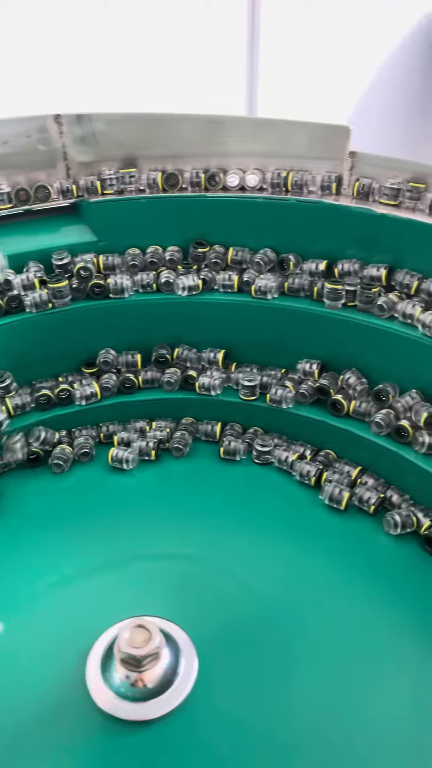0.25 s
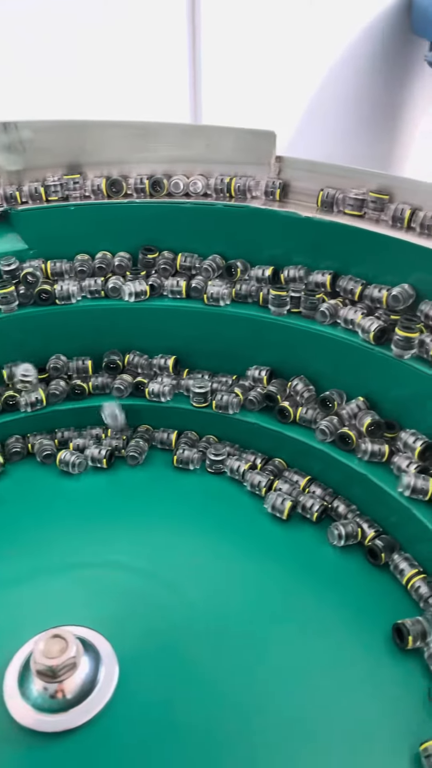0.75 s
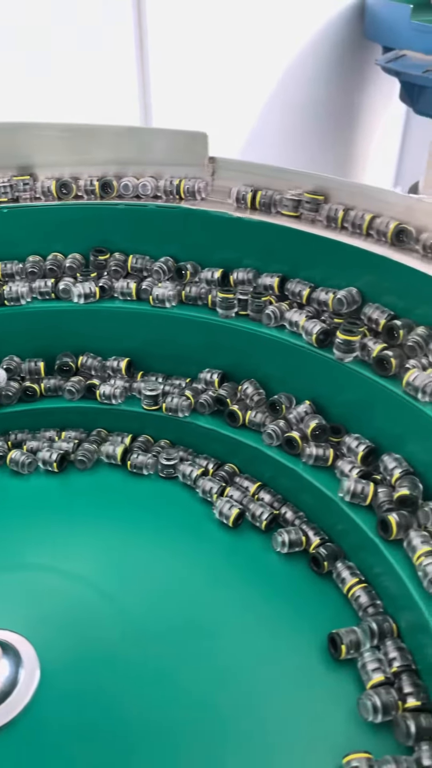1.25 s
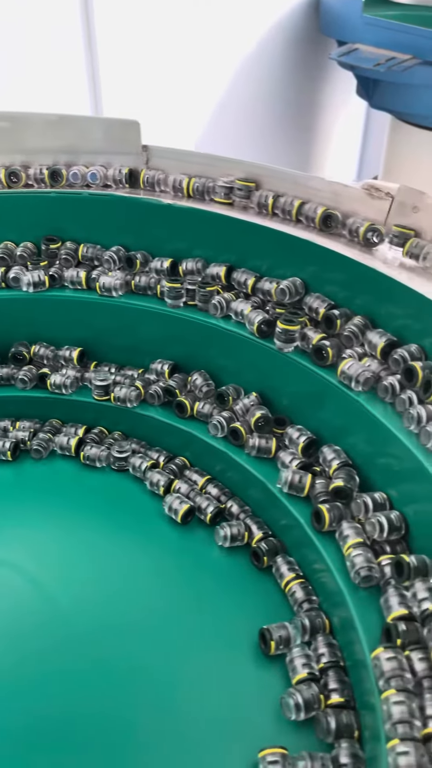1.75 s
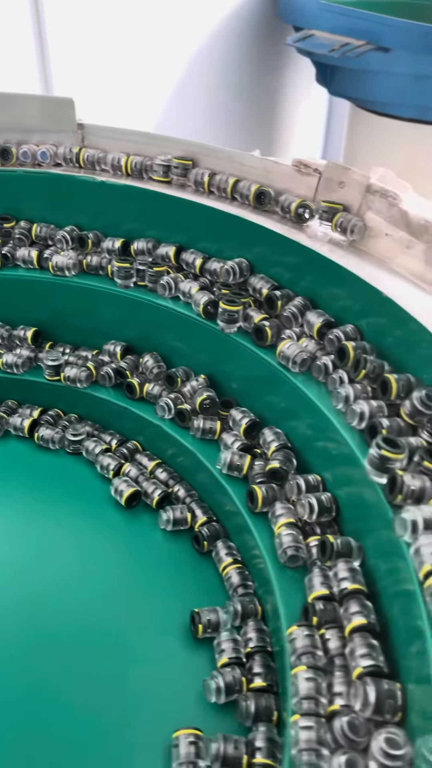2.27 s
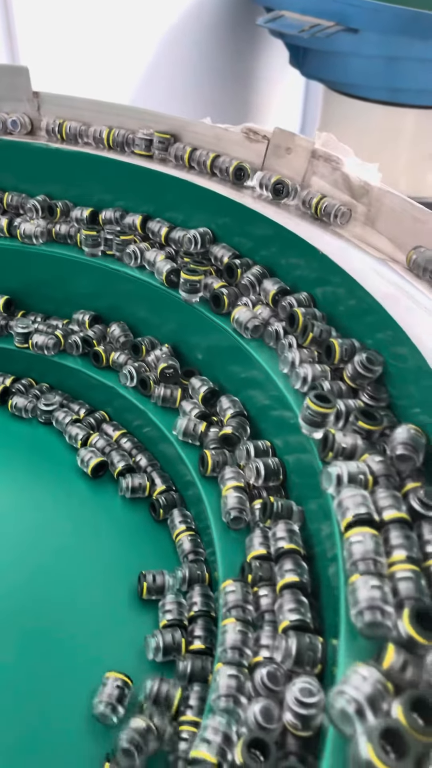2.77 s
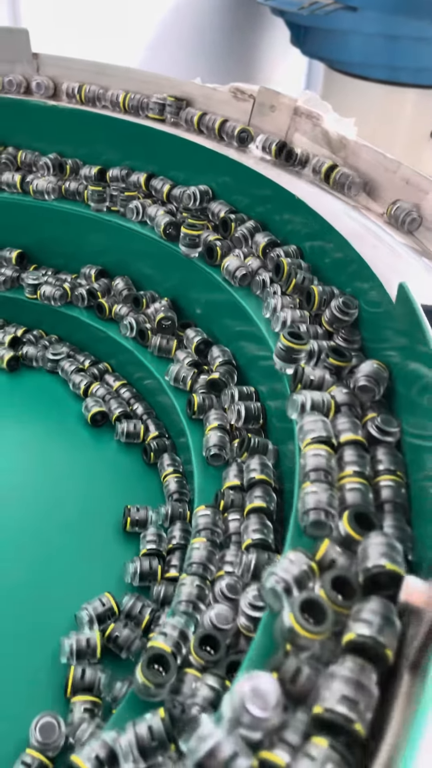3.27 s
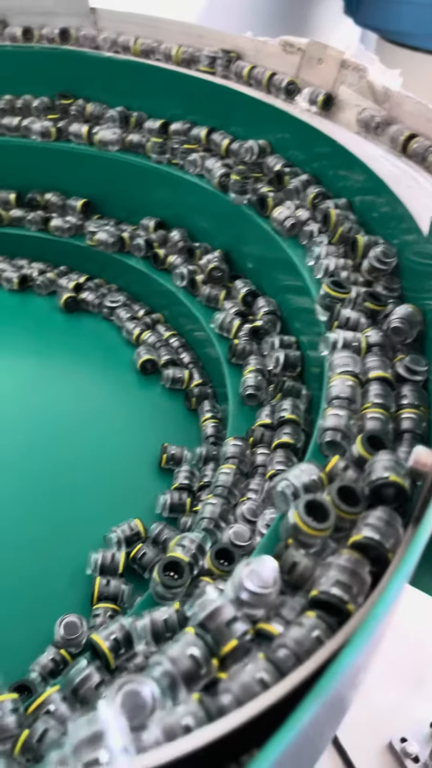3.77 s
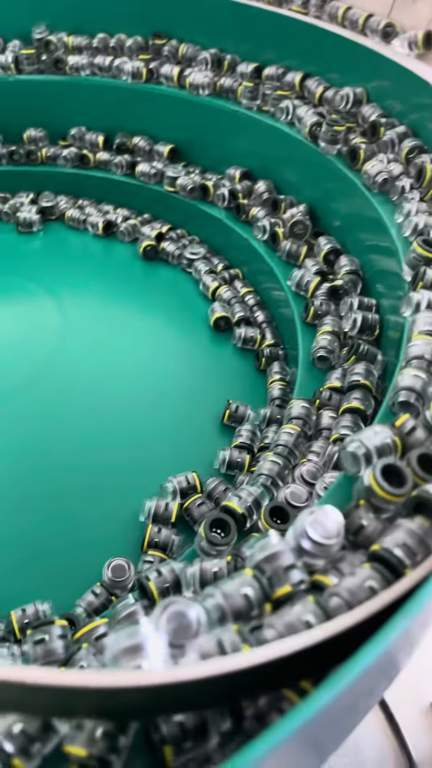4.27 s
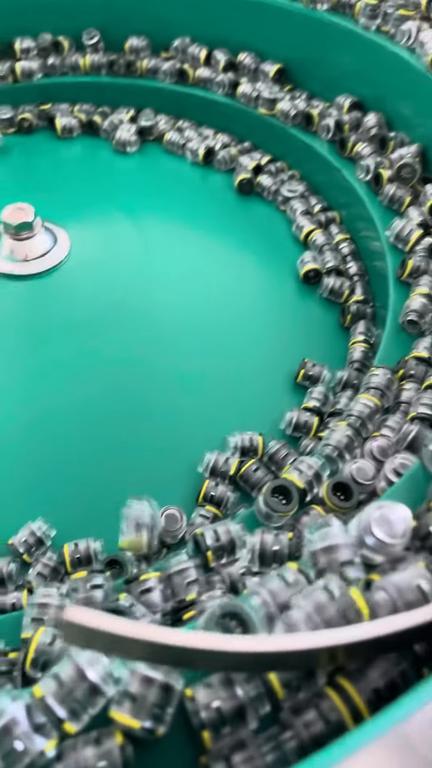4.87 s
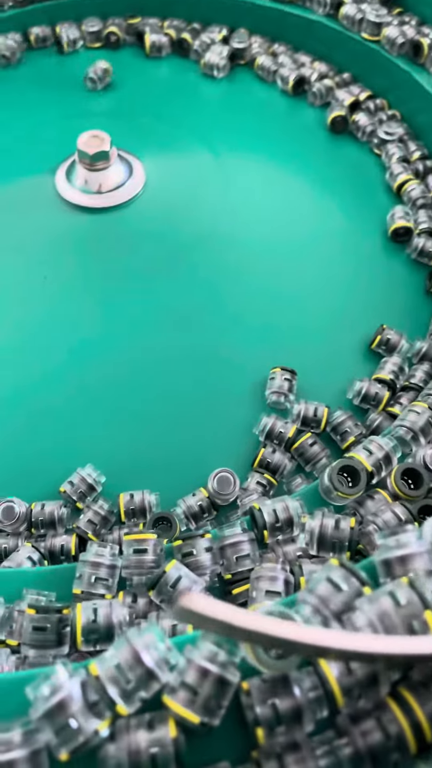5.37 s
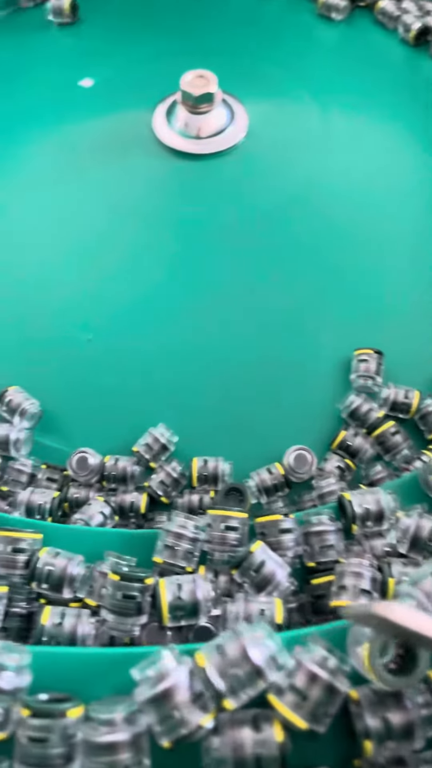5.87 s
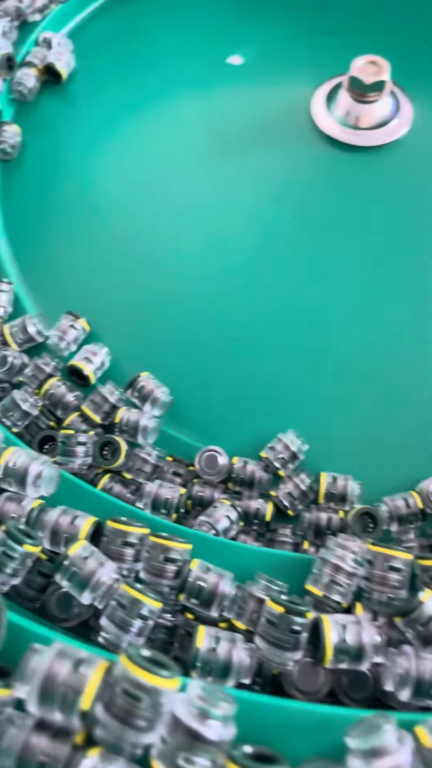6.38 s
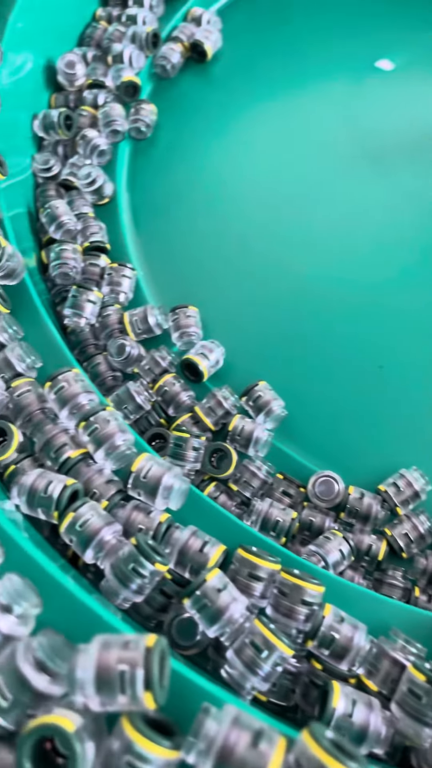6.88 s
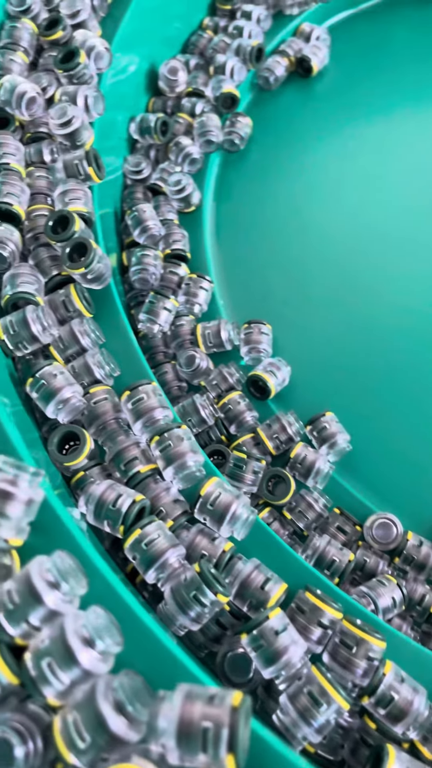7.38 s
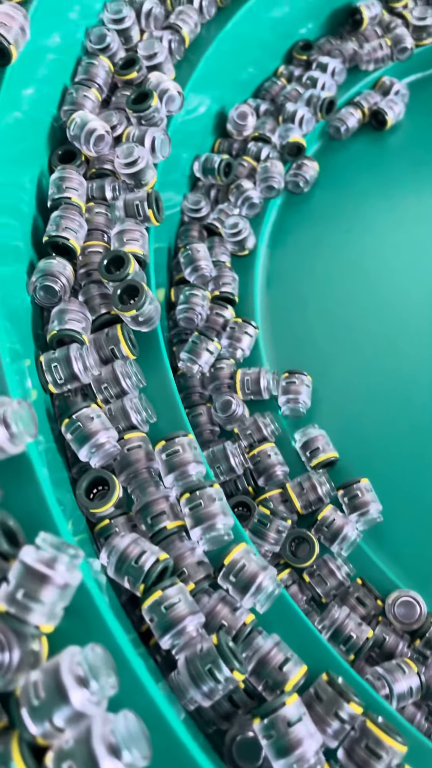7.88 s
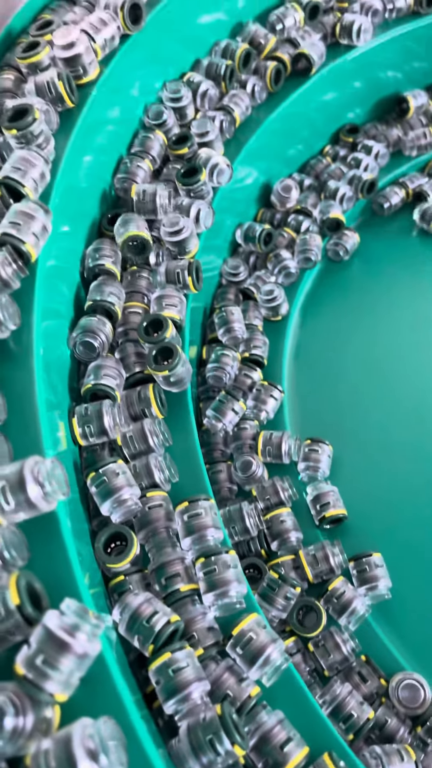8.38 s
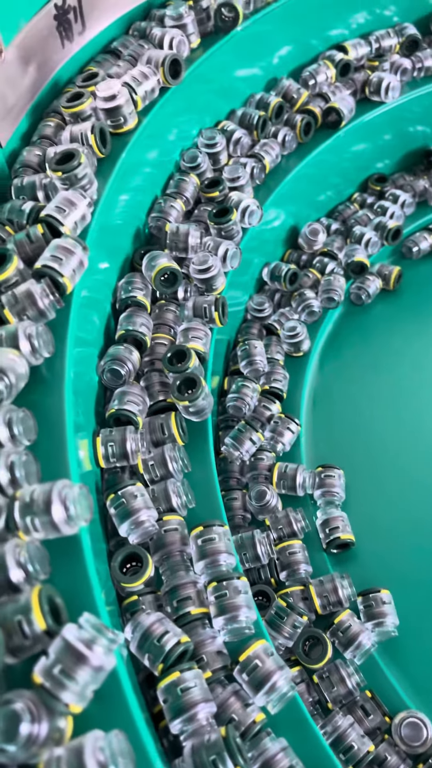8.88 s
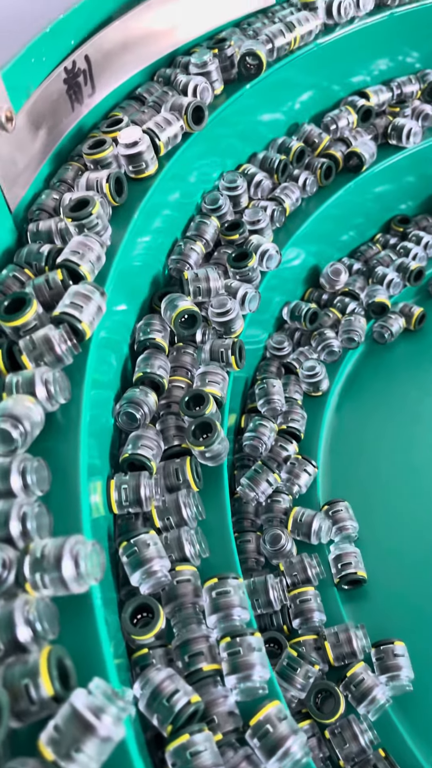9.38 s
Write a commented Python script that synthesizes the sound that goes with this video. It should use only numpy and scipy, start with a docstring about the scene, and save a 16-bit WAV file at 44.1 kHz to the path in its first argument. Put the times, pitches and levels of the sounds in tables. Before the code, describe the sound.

A vibratory feeder bowl hums low and steady while masses of small plastic parts rattle densely, with bright clacks, brief steel rings and soft thuds.

```python
"""Mains-rate hum and a dense rattle of small parts, with bright clacks, steel rings and soft thuds.
A vibratory bowl feeder shakes while a hand-held camera pans over it. Its magnet sums exact orders of the drive;
hopping parts are ticks bunched on each throw; knocking parts are short tinted grains.
Rejected parts fall as shaped noise bursts, and drive resonators for the bowl, a plate and the top rail."""
import sys
import numpy as np
from scipy import signal
from scipy.fft import rfft, irfft
from scipy.io import wavfile
from scipy.ndimage import uniform_filter1d, minimum_filter1d

SR = 44100
rng = np.random.default_rng(int(sys.argv[2]) if len(sys.argv) > 2 else 0)


def generate_wav(sig):
    """Save sig (samples, or channels by samples) to the path in sys.argv[1] as 16-bit PCM at SR."""
    pcm = np.round(np.clip(np.atleast_2d(sig).T, -1, 1) * 32767).astype(np.int16)
    wavfile.write(sys.argv[1], SR, pcm)


def attenuation_scalar(level_db):
    """Turn a level in dB into a linear amplitude multiplier (20 dB per decade)."""
    decades = np.asarray(level_db, float) / 20
    return 10 ** decades


N = 425124
T = np.arange(N) / SR
HZ = np.fft.rfftfreq(N, 1 / SR)

DRIVE_HZ = 50.014
TURN_RAD = 2 * np.pi * DRIVE_HZ * T + 1.38
# Hum as the camera moves. Each row: time in seconds, first order rms in dB, its left-right in dB,
# then the 12th, 14th, 15th and 16th orders in dB before their channel offsets.
HUM_PATH = [(0, -14.5, -5, -45.5, -36, -41, -45.5), (2.2, -15.5, -4.5, -38, -41, -44, -42.5),
            (3.6, -18.5, 0, -41, -40, -42.5, -39.5), (4.4, -20, 1, -40.5, -50, -39.5, -43.5),
            (5.6, -17.5, -1, -40.5, -42, -38, -37.5), (7.2, -17, -1.5, -40.5, -35.5, -46, -36.5),
            (8.4, -17, -3.5, -42, -35, -45, -40), (8.9, -18, -4, -42, -32.5, -46, -45),
            (9.64, -17, -4.5, -47, -35.5, -44, -49)]
# Steady orders of the drive. Each row: order, left rms in dB, right rms in dB.
STEADY_ORDERS = [(2, -24.5, -23), (3, -37, -32.5), (4, -36, -40), (5, -56, -42), (6, -49, -42.5),
                 (8, -58, -42.5), (10, -65.5, -45), (11, -58, -49)]

# Colour of the hopping parts. Each row: frequency in Hz, relative density in dB per Hz.
RATTLE_SPECTRUM = [(40, -3), (150, 4.5), (250, 0.5), (480, -8), (900, -3.5), (1200, 0.5), (2500, 4.5),
                   (3200, 1), (5000, -4.5), (7300, -6.5), (8600, -6.5), (10300, -9), (11400, -15),
                   (12400, -20), (13200, -65), (16000, -85)]
# Rattle as the camera moves. Each row: time in seconds, relative level in dB.
RATTLE_PATH = [(0.0, -26.5), (0.51, -25), (0.88, -26.5), (1.37, -25.5), (8.06, -25.5), (9.64, -27)]
# Bowl resonances, the first five answering a thud. Each row: frequency in Hz, width in Hz, gain in dB.
BOWL_MODES = [(670, 7.7, -22), (680.3, 13, 0.5), (785, 65, -3.5), (1048, 22, -7), (1226, 124, -2.5),
              (367, 4.7, -7.5), (1544, 36, -2.5), (1770, 53, 0), (2394, 19, -3), (2613, 20, -2.5)]

# The clearest falling parts. Each row: time in seconds, relative level in dB,
# clatter t60 in seconds before its limits, body level in dB against the snap.
CLEAR_FALLS = [(.0374, -14, 0.25, -5), (0.1283, -10, .15, 4), (.214, -16.5, 0.12, 4),
               (.2618, -15, 0.21, 3.5), (.2765, -16, 0.066, 9), (.319, -16, 0.18, -2),
               (0.369, -12.5, 0.17, -11), (.438, -18.5, 0.092, -14), (.465, -11, 0.063, 5),
               (0.496, -15, .4, 0.5), (0.584, -9, .12, 3), (0.6479, -11.5, 0.49, -2),
               (1.083, -7.5, .19, -12), (1.21, -16, 0.22, -6), (1.27, -17.5, .12, -2),
               (1.366, -13.5, .096, -21), (1.4117, -8, 0.25, -22.5), (1.439, -11.5, 0.54, 3),
               (1.4777, -8, 0.058, 3), (1.604, -14.5, .1, 2), (1.637, -13.5, 0.11, 5),
               (1.696, -16.5, 0.33, -18), (1.8306, -16, 0.15, 4), (1.9163, -12, .044, -9),
               (1.953, -9.5, 0.066, 1), (2.0685, -6.5, 0.1, 4), (2.4379, -13.5, .056, -14),
               (2.555, -11, 0.18, -4), (2.663, -11.5, .067, -19), (2.753, -3.5, 0.18, -8),
               (2.8741, -15.5, 0.58, 2.5), (3.0319, -10, 0.34, -5), (3.09, -11, .1, -8),
               (3.1575, -12.5, 0.073, 5), (3.332, -13.5, .03, -31), (3.5046, -9.5, 0.051, 11),
               (3.6489, -5, 0.13, -9), (3.7375, -1.5, 0.042, -4), (3.8666, -16, 0.046, -11),
               (3.9398, -11, .12, -16), (3.973, -9, 0.48, -9), (4.007, -9, 0.07, 6.5),
               (4.0882, -14.5, .07, 7), (4.158, -10, 0.075, -33), (4.2284, -8, 0.074, -2),
               (4.2688, -11.5, 0.13, 1), (4.3573, -9.5, 0.059, -3), (4.398, -13, .093, -8),
               (4.451, -11, .03, -7), (4.4985, -10.5, 0.039, -3), (4.5274, -14, 0.084, -2),
               (4.615, -17, .09, -8), (4.8253, -7, 0.047, 8), (4.9301, -8, 0.16, 2),
               (5.033, -10, 0.062, 9.5), (5.0748, -13.5, 0.068, 7), (5.1893, -12, 0.11, -2),
               (5.4077, -13, 0.057, -14), (5.5762, -7, 0.085, 6.5), (5.6013, -7.5, 0.19, -6),
               (5.762, -13, 0.11, 8.5), (5.8293, -8, 0.12, 0.5), (5.898, -6, 0.14, -12),
               (6.0023, -4, 0.18, -11), (6.039, -13, .087, -8), (6.224, -11.5, 0.26, -15),
               (6.2917, -14.5, 0.3, -32), (6.4238, -13, .19, -6), (6.8277, -11, .18, -20),
               (6.915, -3.5, 0.046, -4), (7.007, -13, .079, -13), (7.0353, -6, 0.11, 6.5),
               (7.1323, -8.5, 0.096, 5), (7.194, -11, 0.18, -10), (7.2307, -17.5, 0.17, 10.5),
               (7.5594, -6.5, .049, -5), (7.682, -14, .13, -6), (8.028, -10.5, .35, -26),
               (8.106, -12, .09, -1), (8.1444, -11, 0.68, -3), (8.3763, -9, .16, 3), (8.396, -10, .19, -6),
               (8.512, -16, 0.34, -10), (8.752, -10, 0.037, 10), (8.851, -12.5, 0.16, 1),
               (9.3551, -6, 0.12, -4), (9.4414, -14.5, 0.2, 1), (9.462, -12, 0.34, 3)]
# Colours of a clack: snap, body, top edge. Each row: frequency in Hz, relative density in dB per Hz.
SNAP_SPECTRUM = [(1500, -14), (3500, -3.5), (5500, 3), (9500, 3), (10500, -19.5), (12000, -36)]
BODY_SPECTRUM = [(600, -22), (950, 1), (1500, 10.5), (2500, 9), (4000, 5.5), (6000, -20)]
EDGE_SPECTRUM = [(8500, -52), (10200, 10), (11400, -2), (12500, -12), (13500, -14), (16000, -56)]
# Lesser falls come at random; these are their mean settings.
SMALL_PER_S, SMALL_DB, SMALL_T60_S, SMALL_BODY_DB = 1.2, -19, 0.064, -6
# A full-bodied landing has little top edge.
EDGE_DB, EDGE_PER_BODY_DB, EDGE_SPREAD_DB = -17.5, -0.46, 3.0
TINT_RMS_DB = 4.5  # how strongly each part's own resonances colour its clack

# Modes of a steel plate. Each row: frequency in Hz, gain in dB, t60 in seconds, group 0-4 from low to high.
PLATE_MODES = [(1335, 0, .16, 0), (1499, -2, .13, 0), (1420, -6, .07, 0), (1658, 1, .17, 1),
               (1735, -5, .15, 1), (2550, -8, .1, 1), (3660, -4, .11, 2), (3920, -5, .09, 2),
               (4370, 0, .09, 2), (4520, -4, .07, 2), (6700, -6, .11, 2), (7665, -1, .1, 3),
               (8890, -2, .07, 4), (8650, -5, .06, 4), (9400, -6, .06, 4)]
# Modes of the top rail, columns as for the plate.
RAIL_MODES = [(2500, 0, .2, 0), (3270, -5, .18, 1), (5220, -2, .1, 2), (6440, -10, .15, 3),
              (7780, 0, .15, 4)]
# Parts landing on the plate. Each row: time in seconds, drive of its lowest, middle and highest groups in dB.
PLATE_LANDINGS = [(.465, -27.5, -28, -40), (1.083, -24, -29, -20), (1.411, -25.5, -22, -24),
                  (2.754, -22, -33, -36), (3.65, -28, -16, -27), (3.972, -22, -22, -11),
                  (4.229, -22.5, -25, -35), (5.599, -26, -18.5, -37), (6.004, -20, -20, -18),
                  (6.424, -22.5, -17.5, -11), (6.828, -24.5, -22, -6.5), (8.029, -22, -29, -9),
                  (8.511, -42, -23.5, -18), (8.399, -23.5, -28, -34), (9.462, -22, -25, -13)]
# Parts landing on the rail, columns as for the plate.
RAIL_LANDINGS = [(0.464, -22, -35, -22), (2.903, -36, -22, -30), (3.737, -28, -17, -23),
                 (3.805, -44, -26, -25), (4.158, -39, -23, -24), (4.357, -32, -21, -20),
                 (4.398, -38, -35, -32), (5.762, -27, -21, -34), (6.529, -27, -28, -25.5),
                 (8.145, -38, -27, -25), (8.512, -23, -33, -17)]

# Parts that drop to the bowl's floor. Each row: time in seconds, drive at the start in dB.
FLOOR_DROPS = [(.5846, -60), (1.4392, -54.5), (1.639, -59), (1.952, -58.5), (2.0686, -52.5), (2.1567, -64),
               (3.1577, -61), (3.5043, -59.5), (4.0067, -63), (4.8263, -58.5), (4.9304, -54), (5.034, -55),
               (6.915, -58), (7.0355, -50.5), (7.1319, -54.5), (7.194, -52.5), (7.2313, -55), (7.5594, -57),
               (8.397, -59), (8.752, -55), (8.851, -57.5)]
THUD_T60_S = 0.17

CLINKS_PER_S, CLINK_DB = 49, -27
SHORTEST_CLINK_T60_S, LONGEST_CLINK_T60_S = .015, .035

# Stereo likeness by frequency, nearly alike around 9 kHz and above 12 kHz.
# Each row: frequency in Hz, likeness 0-1, right lag in radians, left-right in dB.
STEREO_IMAGE = [(150, .98, 0, -3), (500, .3, -1, -6), (860, .1, -.3, -7), (1200, .4, .4, -2),
                (1900, .75, .2, 0), (2600, .15, 2.3, 0), (3300, .45, 2.8, -1), (4000, .4, 1.3, -2),
                (4650, .57, 2.9, -3), (5700, .9, 6.1, 0), (7400, .75, 8.1, 0), (8450, .95, 9.2, 0),
                (9000, .99, 9.4, 0), (9550, .995, 9.44, 0), (11200, .7, 11.4, 0), (11900, .97, 12.56, 0),
                (13300, .97, 12.57, 0), (15300, .8, 15.7, 0)]
# Treble roll-off of the microphone. Each row: frequency in Hz, gain in dB.
MICROPHONE_RESPONSE = [(12600, 0), (13300, -16), (16000, -20)]


def evened(x):
    """Scales to rms 1."""
    return x / np.sqrt(np.mean(x ** 2))


def smoothed_twice(x, size):
    """Two running means along the last axis."""
    return uniform_filter1d(uniform_filter1d(x, size), size)


def read(hz, values):
    """A spectrum table at every frequency, straight on a log axis."""
    return np.interp(np.log(HZ + 1), np.log(np.asarray(hz) + 1.), values)


def coloured(x, spectrum):
    """Filters by a spectrum table, keeping the power of white input."""
    response = evened(attenuation_scalar(read(*np.transpose(spectrum))))
    return irfft(rfft(x) * response, N)


def ring(blows, hz, t60_s):
    """A two-pole resonator: each click starts a dying sine of its height."""
    radius = attenuation_scalar(-60 / (max(t60_s, .0003) * SR))
    w = 2 * np.pi * hz / SR
    return signal.lfilter([0, np.sin(w)], [1, -2 * radius * np.cos(w), radius * radius], blows)


def waver():
    """Slow chance for each channel, rms 1 overall."""
    return evened(smoothed_twice(rng.standard_normal((2, N)), 3000))


def hum():
    """Exact orders of the magnet's pull; each steady order lags more, peaking the wave; the top ones waver."""
    s, *columns = np.transpose(HUM_PATH)
    first_db, pan_db, *upper_db = (np.interp(T, s, c) for c in columns)
    lead_rad = np.array([[0.], [.08]])
    out = attenuation_scalar([first_db + pan_db / 2, first_db - pan_db / 2]) * np.cos(TURN_RAD + lead_rad)
    for order, *db in STEADY_ORDERS:
        phase = order * (TURN_RAD + lead_rad) - 0.78 * (order - 1)
        out = out + attenuation_scalar(np.array(db))[:, None] * np.cos(phase)
    for order, db in zip((12, 14, 15, 16), upper_db):
        level = attenuation_scalar([db - 1.5, db + 6.0] + 2.0 * waver())
        offset_rad = np.array([[1.514 * order], [1.477 * order + 2.07]])
        out = out + level * np.cos(order * TURN_RAD + offset_rad)
    return np.sqrt(2) * out  # rms to peak


def bowl(drive, modes):
    """The coated bowl's damped resonances; a wider one dies sooner."""
    return sum(attenuation_scalar(db) * np.sqrt(width_hz) * ring(drive, hz, 1.9 / width_hz) for hz, width_hz, db in modes)


def rattle():
    """Dense ticks of hopping parts, bunched on each throw of the track; they also drum the bowl."""
    ticking = rng.random((2, N)) < 5000 / SR  # 5000 ticks a second in each channel
    size = attenuation_scalar(3.6 * np.minimum(rng.exponential(1, (2, N)), 5)) * ticking
    ticks = .5 * evened(size * rng.standard_normal((2, N)))
    ticks = ticks + 0.97 * rng.standard_normal((2, N))
    surge = evened(smoothed_twice(rng.standard_normal(N), 900))
    bunching_db = 1.0 * np.cos(TURN_RAD + 1.6) + 1.6 * surge
    track = coloured(ticks * attenuation_scalar(bunching_db), RATTLE_SPECTRUM)
    thrown = ticks * (0.44 + np.exp(0.8 * (np.cos(TURN_RAD + 0.17) - 1)))
    drummed = bowl(thrown, BOWL_MODES)
    nearness = attenuation_scalar(np.interp(T, *np.transpose(RATTLE_PATH)))
    return nearness * (attenuation_scalar(2.0) * evened(track) + attenuation_scalar(-6.5) * evened(drummed))


def small_falls():
    """Lesser falls at random times, in rows like those of the clear ones."""
    return [(.01 + when * (N / SR - .01), SMALL_DB + 1.7 * (size - .5),
             SMALL_T60_S * (.5 + length), SMALL_BODY_DB + 12 * (face - .5))
            for when, size, length, face in rng.random((round(SMALL_PER_S * N / SR), 4))]


def falls():
    """A crack and a ragged clatter of rebounds, tinted by the part's own resonances."""
    t = np.arange(8192) / SR
    log_hz = np.log(np.fft.rfftfreq(len(t), 1 / SR) + 1)
    colours_db = []
    for spectrum in (SNAP_SPECTRUM, BODY_SPECTRUM, EDGE_SPECTRUM):
        hz, db = np.transpose(spectrum)
        colours_db.append(np.interp(log_hz, np.log(hz), db))
    out = np.zeros((2, N + len(t)))
    for s, db, t60_s, body_db in CLEAR_FALLS + small_falls():
        start = round(s * SR) - 30
        edge_db = EDGE_DB + EDGE_PER_BODY_DB * body_db + EDGE_SPREAD_DB * rng.standard_normal()
        lumps = attenuation_scalar(2.9 * evened(uniform_filter1d(rng.standard_normal(len(t)), 120)))
        clatter = attenuation_scalar(-60 * t / np.clip(t60_s, .03, .4) - 6.5) * lumps
        # the first contact is sharpest
        crack = attenuation_scalar(-60 * t / 0.079 - 7.5) + attenuation_scalar(-60 * t / .012 - 9)
        noise = rng.standard_normal((2, len(t)))
        tint_db = TINT_RMS_DB * evened(smoothed_twice(rng.standard_normal(len(log_hz)), 25))
        snap, body, edge = (irfft(rfft(noise) * evened(attenuation_scalar(c + tint_db))) for c in colours_db)
        bright = (snap + attenuation_scalar(edge_db) * edge) * (clatter + crack) * (1 - np.exp(-t / 0.0012))
        full = attenuation_scalar(body_db) * body * clatter * (1 - np.exp(-t / 0.01))
        out[:, start:start + len(t)] += attenuation_scalar(db) * (bright + full)
    return out[:, :N]


def steel(modes, hits):
    """Each landing strikes the modes once, and the bouncing part shakes them for a few hundredths of a second."""
    t = np.arange(4000) / SR
    drives = np.zeros((5, 2, N + len(t)))  # group, channel, sample
    for s, *db in hits:
        shake = attenuation_scalar(-17) * rng.standard_normal((2, len(t))) * attenuation_scalar(-60 * t / .07)
        shake[:, 20] += rng.choice([-.6, .6], 2)  # the strike
        group_db = np.interp(range(5), (0, 2, 4), db)
        start = round(s * SR)
        drives[..., start:start + len(t)] += attenuation_scalar(group_db)[:, None, None] * shake
    return sum(attenuation_scalar(db) * ring(drives[group, :, :N], hz, t60_s) for hz, db, t60_s, group in modes)


def thuds():
    """A dying burst of soft rebounds drives the bowl's thud resonances."""
    t = np.arange(8192) / SR
    drive = np.zeros((2, N + len(t)))
    for s, db in FLOOR_DROPS:
        start = round(s * SR)
        burst = attenuation_scalar(db - 60 * t / THUD_T60_S) * rng.standard_normal((2, len(t)))
        drive[:, start:start + len(t)] += burst
    b, a = signal.butter(2, [500, 1400], "band", fs=SR)
    return bowl(signal.lfilter(b, a, drive[:, :N]), BOWL_MODES[:5])


def clinks():
    """Single parts knocking together: short bright grains of noise through one resonance each."""
    t = np.arange(2000) / SR
    out = np.zeros((2, N + len(t)))
    for when, pitch, size, length in rng.random((round(CLINKS_PER_S * N / SR), 4)):
        t60_s = np.interp(length, (0, 1), (SHORTEST_CLINK_T60_S, LONGEST_CLINK_T60_S))
        hiss = rng.standard_normal((2, len(t))) * attenuation_scalar(-60 * t / t60_s)
        grain = ring(np.diff(hiss, prepend=0), 3300 * 3.0 ** pitch, 0.0017)
        # few are loud; higher ones are softer
        level = attenuation_scalar(CLINK_DB - 4.9 * np.log(size + 0.083) - 7 * pitch)
        start = round(when * N)
        out[:, start:start + len(t)] += level * grain
    return out[:, :N]


def stereo_image(pair):
    """By frequency, the right channel is a lagged share of the left plus independent sound."""
    hz, *columns = np.transpose(STEREO_IMAGE)
    likeness, lag_rad, pan_db = (read(hz, c) for c in columns)
    likeness = np.clip(likeness, 0, 1)
    left, independent = rfft(pair)
    right = likeness * np.exp(-1j * lag_rad) * left + np.sqrt(1 - likeness ** 2) * independent
    return irfft(np.array([left * attenuation_scalar(pan_db / 2), right * attenuation_scalar(-pan_db / 2)]), N)


def scene():
    """Hum, rattle, clinks, falling parts and the steel they ring."""
    parts = rattle() + clinks() + falls() + thuds()
    rings = steel(PLATE_MODES, PLATE_LANDINGS) + steel(RAIL_MODES, RAIL_LANDINGS)
    return hum() + stereo_image(parts + rings)


def top_cut(x):
    """Nothing passes above the cut-off."""
    return signal.sosfilt(signal.butter(12, 16340, fs=SR, output="sos"), x)


def record(dry):
    """Treble roll-off, then a limiter that looks ahead and ducks everything under the loudest clacks."""
    heard = irfft(rfft(dry) * attenuation_scalar(read(*np.transpose(MICROPHONE_RESPONSE))), N)
    level_db = 20 * np.log10(abs(heard).max(0) + 1e-9)
    peak_db = -minimum_filter1d(-level_db, size=121)
    recovery_db = T * 300  # 300 dB a second
    held_db = np.maximum.accumulate(peak_db + recovery_db) - recovery_db
    over_db = np.maximum(held_db + .2, 0)  # ceiling -0.2 dB
    limited = heard / attenuation_scalar(uniform_filter1d(over_db, size=60))
    return top_cut(np.clip(limited, -1, 1))


dry = scene()
out = record(dry)
generate_wav(out)
```